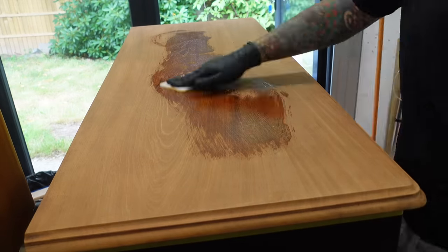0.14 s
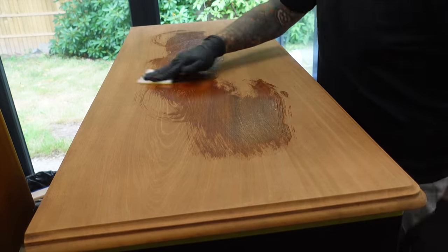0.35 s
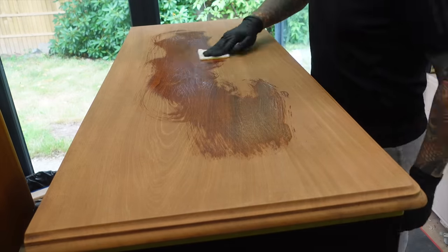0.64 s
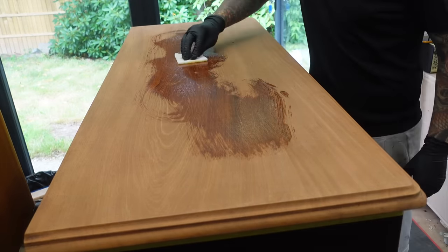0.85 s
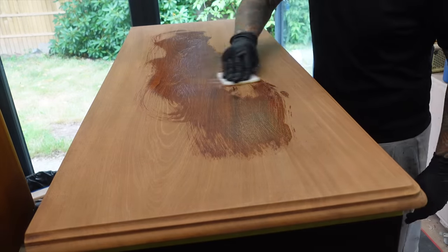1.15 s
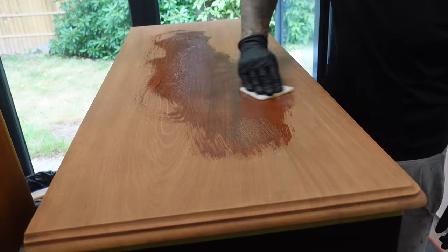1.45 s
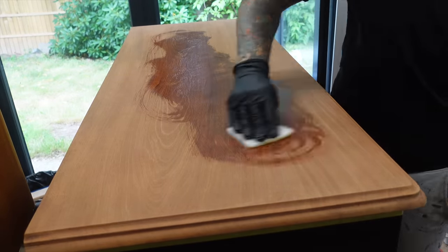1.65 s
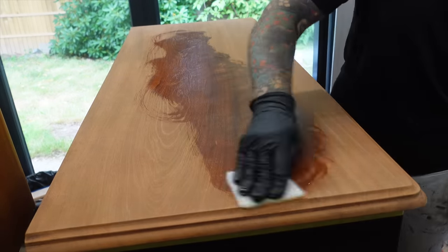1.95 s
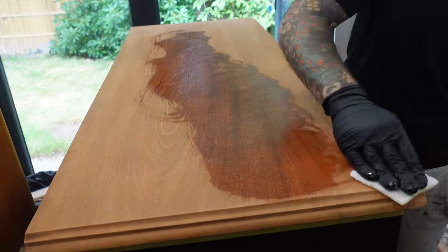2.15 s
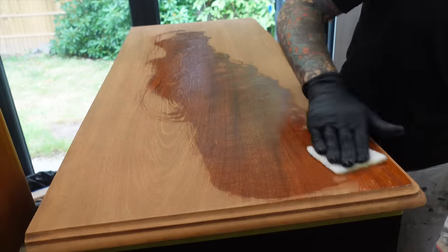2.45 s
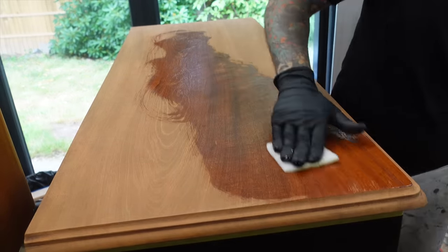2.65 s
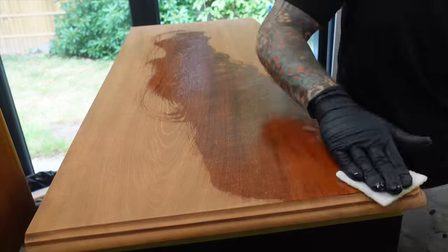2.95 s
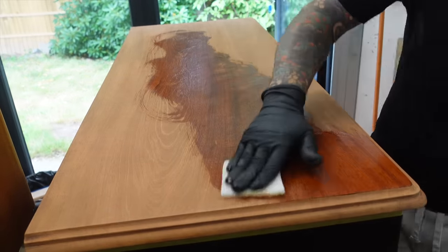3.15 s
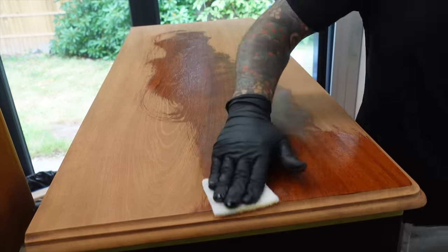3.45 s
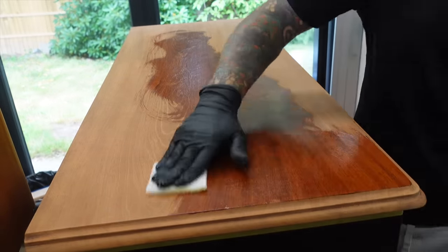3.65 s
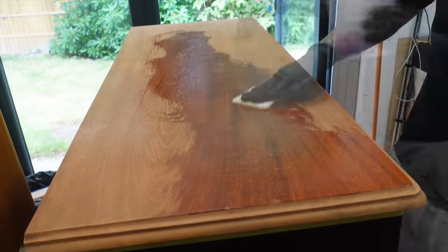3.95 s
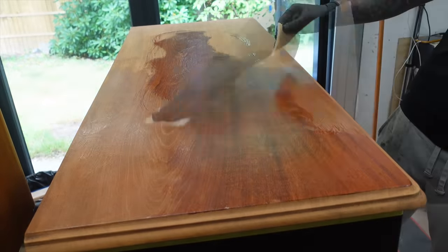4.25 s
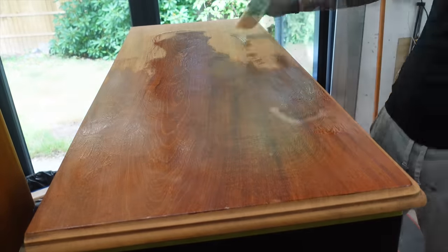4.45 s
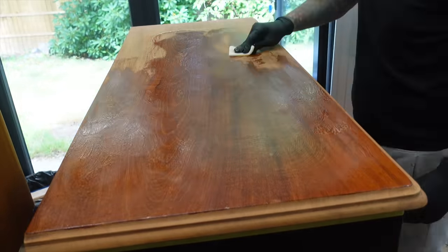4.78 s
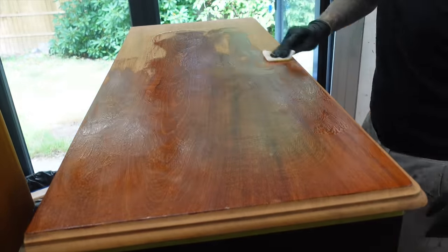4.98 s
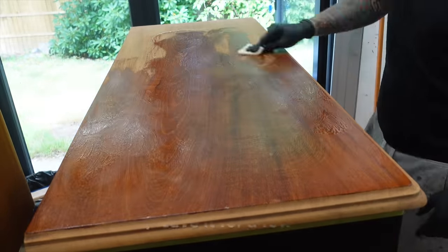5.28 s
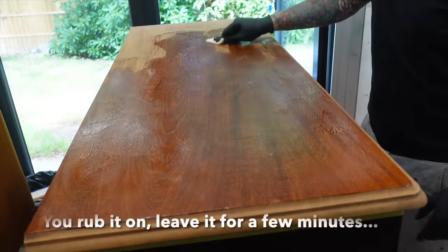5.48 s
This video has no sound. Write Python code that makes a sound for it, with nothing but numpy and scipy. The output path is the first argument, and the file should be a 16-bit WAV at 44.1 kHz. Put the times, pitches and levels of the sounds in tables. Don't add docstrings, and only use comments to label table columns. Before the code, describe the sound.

A cloth pad scrubs a wooden tabletop in very fast, bright hissing strokes, with brief halts, small knocks and faint squeaks.

```python
import sys
import numpy as np
from scipy import signal
from scipy.io import wavfile
from scipy.ndimage import uniform_filter1d

SR = 44100
rng = np.random.default_rng(int(sys.argv[2]) if len(sys.argv) > 2 else 0)


def log_audio(samples):
    frames = np.atleast_2d(samples).T
    limited = np.clip(frames, -1, 1)
    pcm = np.round(limited * 32767).astype(np.int16)
    wavfile.write(sys.argv[1], SR, pcm)


def ratio_of_db(decibels):
    return 10 ** (np.asarray(decibels, float) / 20)


N = 247842
TIME = np.arange(N) / SR


def rms_one(x):
    return x / np.sqrt(np.mean(x ** 2) + 1e-20)


def at_hz(points, hz):
    table_hz, values = np.transpose(points)
    return np.interp(np.log(hz), np.log(table_hz), values)


def along(curve, s):
    when, *columns = np.transpose(curve)
    return [np.interp(s, when, column) for column in columns]


def drift(rate):
    every, settle = 40, 2000
    r = np.exp(-2 * np.pi * rate * every / SR)
    coarse = rng.standard_normal(N // every + 2 + settle)
    slow = signal.lfilter([1], [1, -2 * r, r * r], coarse)[settle:]
    return np.interp(np.arange(N) / every, np.arange(len(slow)), rms_one(slow))


def resonance(x, hz, width):
    r = np.exp(-np.pi * width / SR)
    poles = [1, -2 * r * np.cos(2 * np.pi * hz / SR), r * r]
    return signal.lfilter([(1 - r * r) / 2, 0, (r * r - 1) / 2], poles, x)


def twice_resonant(count, hz, width):
    once = resonance(rng.standard_normal(count), hz, width)
    return rms_one(resonance(once, hz, width))


def banded_noise(spectrum, count, patchy_db, rate, lift_db=0, reach=None):
    steady, out = 0, 0
    edges = np.geomspace(spectrum[0][0], spectrum[-1][0], count + 1)
    white = rng.standard_normal((2, N))
    for k, (low, high) in enumerate(zip(edges, edges[1:])):
        hz = np.sqrt(low * high)
        band_pass = signal.butter(2, [low, high], "band", fs=SR, output="sos")
        band = signal.sosfilt(band_pass, white[k % 2]) * ratio_of_db(at_hz(spectrum, hz))
        steady = steady + np.mean(band ** 2)
        band_lift_db = 0 if reach is None else lift_db * at_hz(reach, hz)
        out = out + band * ratio_of_db(patchy_db * drift(rate) + band_lift_db)
    return out / np.sqrt(steady)


# (frequency [Hz], density [dB per Hz])
HISS = [(1200, -17.5), (2000, -17), (2500, -21), (3100, -15), (3800, -14.5), (4200, -7.5), (4900, -8),
        (5400, -5), (7000, -3.5), (8600, -1), (12100, 1.5), (15200, 0), (17500, 2.5)]
# (frequency [Hz], share [1])
PRESSURE_REACH = [(2000, 0.71), (4000, 1.49), (6500, 0.67), (10000, 0.23)]
# (frequency [Hz], level [dB])
PAD_WHISTLES = [(2580, -33), (3230, -30.5), (3700, -29), (4290, -24), (5300, -19.5), (5900, -26.5),
                (6300, -19), (7030, -18.5), (7580, -43), (9200, -41), (11100, -14), (12500, -44)]


def fibres(hiss_db, pressure_db):
    out = banded_noise(HISS, count=24, patchy_db=2.17, rate=50, lift_db=pressure_db, reach=PRESSURE_REACH)
    for hz, whistle_db in PAD_WHISTLES:
        pressed_db = pressure_db * at_hz(PRESSURE_REACH, hz)
        flare_db = whistle_db - 5 + 4 * drift(25) + pressed_db
        out = out + twice_resonant(N, hz, width=260) * ratio_of_db(flare_db)
    return ratio_of_db(hiss_db + 0.13 * drift(32)) * out


# (time [s], hiss level [dB])
TURNS = [(0.0, -32), (0.063, -42.5), (0.128, -42.5), (0.184, -37.5), (0.236, -36.5), (0.281, -37.5),
         (0.326, -36), (0.37, -33), (0.439, -38), (0.512, -33), (0.607, -42), (0.639, -38.5),
         (0.694, -39.5), (0.839, -29), (0.931, -42), (0.978, -41.0), (1.025, -40.5), (1.066, -40),
         (1.109, -38.5), (1.151, -42), (1.195, -35), (1.236, -41), (1.285, -34), (1.324, -41.5),
         (1.374, -36), (1.419, -37), (1.469, -36), (1.514, -37), (1.565, -36), (1.611, -37.0),
         (1.658, -38.5), (1.704, -37), (1.746, -39), (1.793, -38), (1.837, -38.0), (1.883, -35.5),
         (1.93, -37.5), (1.973, -39), (2.017, -39.5), (2.056, -40.5), (2.13, -50), (2.181, -46),
         (2.232, -50), (2.281, -47.5), (2.324, -54.5), (2.372, -46.5), (2.414, -44.5), (2.46, -42),
         (2.5, -40), (2.546, -48),
         (2.588, -40), (2.634, -44), (2.677, -39), (2.724, -45), (2.768, -41.5), (2.848, -42),
              (2.89, -44), (2.941, -41), (2.993, -47.5), (3.106, -46.5), (3.211, -45.5), (3.254, -43.0),
              (3.302, -46), (3.345, -43), (3.393, -45), (3.438, -42), (3.483, -47.5), (3.578, -47),
              (3.624, -41.5), (3.672, -48), (3.716, -43.5), (3.762, -45.5), (3.822, -40), (3.888, -39.0),
              (3.953, -40.5), (4.048, -46), (4.143, -50), (4.247, -51.5), (4.33, -57.5), (4.504, -44),
              (4.587, -42), (4.613, -46), (4.664, -39), (4.734, -45.5), (4.782, -34), (4.83, -39),
              (4.879, -36), (4.94, -39), (4.97, -43.5), (5.041, -43), (5.086, -46), (5.135, -47),
              (5.183, -49), (5.235, -47), (5.286, -44), (5.333, -45.5), (5.368, -38), (5.428, -38.5),
              (5.497, -40.5), (5.53, -41.0)]
# (time [s], hiss level [dB], pressure as low-hiss gain [dB])
CRESTS = [(0.02, -35.5, -1.5), (0.08, -34, 0), (0.155, -33.5, -4), (0.213, -29, -2.5),
          (0.254, -35, 4), (0.313, -34.5, -1), (0.354, -33.5, -0.5), (0.39, -33.5, 1),
          (0.492, -34.5, 2), (0.536, -34.5, 5), (0.628, -34.5, 3.5), (0.673, -33.0, -1.5),
          (0.724, -32.5, 2), (0.914, -38.5, 2.5), (0.95, -35, 1.5), (1.003, -31, 1),
          (1.05, -34.5, 0.5), (1.097, -29.5, 4), (1.132, -30.5, 2.0), (1.176, -33, 5),
          (1.21, -29.5, 1.5), (1.259, -25.5, -4.5), (1.299, -32, 3), (1.351, -28.5, -3),
          (1.396, -33, 7), (1.444, -28, -4.5), (1.489, -32.5, 0.5), (1.545, -29, -3),
          (1.589, -33, 1.5), (1.635, -29, -0.5), (1.68, -30, -2.0), (1.722, -29, -1), (1.764, -32, 2),
          (1.814, -32, 0.5), (1.859, -28, -2.0), (1.909, -29, -6.5), (1.95, -30, 0.5),
          (1.994, -29.5, -4.5), (2.038, -31.5, 1.0), (2.075, -32.0, 1), (2.162, -38, 0.5),
          (2.199, -41, 5), (2.267, -41, 0.5), (2.306, -41.5, -0.5), (2.344, -39, 4.5),
          (2.401, -39.5, -4), (2.442, -38.5, 1.5), (2.491, -38, -3), (2.527, -38, -0.5),
          (2.579, -39, -2.0),
          (2.609, -37, -1.5), (2.661, -38.5, -1), (2.7, -37.5, -2.5), (2.755, -38, 0.5),
               (2.831, -37.5, -2), (2.866, -37.5, 0.5), (2.916, -37.5, 0), (2.956, -39.5, -3.5),
               (3.062, -36.5, -1), (3.144, -37.5, 4), (3.242, -37.5, 0.5), (3.277, -37, -3.5),
               (3.328, -38, 1.5), (3.375, -38, -1.5), (3.407, -38.5, 0.5), (3.453, -37.5, 2),
               (3.516, -37, 0), (3.592, -39.5, 3.5), (3.644, -36.5, 2), (3.701, -37, 2.5),
               (3.738, -37, 1.0), (3.788, -38.5, 1.5), (3.852, -31.5, -2.5), (3.91, -35.5, 0.5),
               (4.002, -36.5, 3), (4.085, -39.0, 2.5), (4.183, -41, 0.5), (4.284, -43, 1.5), (4.4, -38, -4),
               (4.568, -37, -1.5), (4.597, -40.5, 0), (4.65, -34.0, 0), (4.686, -35.0, 5), (4.766, -33, 3),
               (4.806, -34, 2), (4.86, -34, 1.5), (4.908, -31, -5.5), (4.955, -33.5, 4.5),
               (4.992, -30.5, 0.5), (5.055, -38, -4.0), (5.117, -39.5, -3.0), (5.158, -40.5, -1),
               (5.207, -38.5, -5), (5.26, -39, -1.5), (5.312, -35, -3), (5.355, -35, -4), (5.391, -37, 4.5),
               (5.479, -35.5, 0.5), (5.519, -36.5, 3), (5.569, -34, 0)]
# (time [s], low-hiss gain [dB])
DIGS = [(.265, 4.5), (.345, 6), (1.098, 2), (1.132, -0.5), (1.203, 3), (3.15, 1), (3.52, 4), (4.991, 3),
        (5.3, 2.5), (5.38, 5), (5.469, 5.5)]


def hand(roundness):
    sharp_turn_db, dig_s, grip_chance_db = 0.5, 0.0053, 1.2
    turn, turn_db = np.transpose(TURNS)
    crest, crest_db, press_db = np.transpose(CRESTS)
    knots = np.sort(np.ravel([turn, crest], order="F"))
    phase = np.interp(TIME, knots, np.arange(len(knots)))
    speed = np.abs(np.sin(np.pi / 2 * phase)) ** roundness
    step = np.floor(phase)
    eased = step + np.where(step % 2 == 0, speed, 1 - speed)
    knots_db = np.ravel([turn_db - sharp_turn_db, crest_db], order="F")
    hiss_db = np.interp(eased, np.arange(len(knots)), knots_db)

    pressure_db = np.interp(TIME, crest, press_db)
    for s, dig_db in DIGS:
        pressure_db = pressure_db + dig_db * np.exp(-((TIME - s) / dig_s) ** 2 / 2)

    hum_db = along(PLACE, crest)[0]
    grip_db = hum_db + grip_chance_db * rng.standard_normal(len(crest))
    held_db = uniform_filter1d(grip_db[(step // 2).astype(int)], size=400)
    halt_db = halts()
    return hiss_db + halt_db, speed, pressure_db, held_db + halt_db


# (time [s], drop [dB], slowing [s], picking up [s])
STOPS = [
    (0.849, 27.5, 0.16, 0.057),
    (.845, 20, 0.035, 0.025),
    (4.5, 12, 0.25, 0.065),
    (5.012, 5.5, .008, .03),
    (5.402, 6, 0.0066, 0.016),
    (5.61, 6.5, 0.031, .05),
]


def halts():
    total_db = np.zeros(N)
    for s, drop_db, slowing, picking in STOPS:
        away = np.where(TIME < s, (s - TIME) / slowing, (TIME - s) / picking)
        total_db -= drop_db * np.cos(np.pi / 2 * np.clip(away, 0, 1)) ** 2
    return total_db


# (time [s], hum level [dB], hollowness under the pad [dB], shift along the grain [dB])
PLACE = [(0, -52, -4.5, 2), (.45, -51, -9.5, -3.5), (.66, -49.5, -11, -0.5), (1.0, -55.5, -6, 0.5),
         (1.63, -50, -8.5, 2.5), (1.9, -56.5, -9, 2), (2.13, -70, 5, 4.5), (2.34, -54.5, 6.5, -2.5),
         (2.79, -54.5, 4, 0.5), (3.07, -51.5, -5.5, 1), (3.4, -51, 0, -0.5), (3.75, -62.5, 7, -2.5),
         (3.9, -52, -12, 0.5), (4.4, -59, -4, 0.5), (4.7, -53.5, -3.5, -2.5), (4.99, -70, 4, -3.5),
         (5.08, -66, 6, -2.5), (5.62, -59, 3.5, -3.5)]
# (frequency [Hz], width [Hz], level [dB], share of hollowness [1], share of shift [1])
BOARD_MODES = [(211, 19.4, -18, 2, 0), (317, 90, -11.5, 0.84, -0.3), (385, 52, -8.5, 1.42, -0.3),
               (472, 13, -11.5, 2, 0.7), (589, 17, -9.5, 1.5, 0.7), (777.5, 13, -11.5, 1.53, 0.2),
               (842, 44, -4.5, 1.05, 3.5), (1000, 53, -1, 1, -0.5), (1198, 40, -19, 3.5, 0.5),
               (1354, 21, -9.5, 0.66, 1.4), (1461, 22, -2.5, 0.14, -1.96), (1836, 12, -28.5, -1.2, 6),
               (1983, 58, -4.5, 0, 0), (2310, 300, -13, 0.5, 6)]
# (frequency [Hz], density [dB per Hz])
BOARD_WASH = [(110, -25.5), (200, -20), (400, -15.5), (700, -6.5), (1000, -2.5), (1600, -6.5),
              (2400, -15.5), (4000, -16)]
# (frequency [Hz], share [1])
DEEP_REACH = [(150, 3.8), (300, 2.7), (600, 0.5), (900, 0.019)]


def board(level_db):
    _, hollow_db, shift_db = along(PLACE, TIME)
    wash = banded_noise(BOARD_WASH, count=10, patchy_db=3.5, rate=53, lift_db=hollow_db, reach=DEEP_REACH)
    out = ratio_of_db(level_db - 11) * wash
    for hz, width, mode_db, hollow, shift in BOARD_MODES:
        place_db = hollow * hollow_db + shift * shift_db
        friction_db = level_db + mode_db - 7.5 + place_db + 1.9 * drift(18.2)
        friction = rng.standard_normal(N) * ratio_of_db(friction_db)
        out = out + resonance(friction, hz, width) * np.sqrt(SR / (np.pi * width))
    return out


# (time [s], peak [dB], deep part [dB], crack [dB], scuff after it [dB])
KNOCKS = [(0.074, -36.5, -25, -1, -1), (0.297, -34, -19, -2, -16), (0.625, -44, -23, 22.5, 4),
          (0.630, -40, -20, -9, -15), (1.061, -38.5, -33, 6, 2), (1.989, -25, -28, -2, -5.5),
          (2.193, -39.5, -16, -2, 9), (2.335, -34, -26, -3, 17), (2.442, -32.5, -32, 3, -4),
          (2.53, -35.5, -37, -10, -6), (2.862, -41, -16, 0, -6), (3.118, -34.5, -23, -12, 6),
          (4.183, -38.5, -27, -8, -10), (4.528, -41, -8, 2, -12)]


def knocks():
    out = np.zeros(N)
    t = np.arange(round(0.12 * SR)) / SR
    no_deep = signal.butter(4, 310, "high", fs=SR, output="sos")
    for s, peak_db, deep_db, crack_db, scuff_db in KNOCKS:
        decay = np.exp(-t / 0.003) + ratio_of_db(scuff_db) * np.exp(-t / 0.02)
        contact = rng.standard_normal(len(t)) * decay
        pressed = contact * (1 - np.exp(-t / 0.0012))
        body = 0
        for hz, width, *_ in BOARD_MODES:
            if hz < 700:
                mode_db = min(deep_db + 12.5, -3)
            else:
                mode_db = -11 * np.log2(hz / 1300) ** 2
            ring = resonance(pressed, hz, 3 * width) / np.sqrt(width)
            body = body + ring * ratio_of_db(mode_db + rng.normal(0, 0.17))
        body = signal.sosfilt(no_deep, body)
        crack_decay = np.exp(-t / 0.0034) + 0.47 * np.exp(-t / 0.019)
        crack = resonance(contact, 5800, 11000) * crack_decay
        hit = body / np.abs(body).max() + ratio_of_db(crack_db + 4) * crack / np.abs(crack).max()
        i = round(s * SR)
        out[i:i + len(t)] += ratio_of_db(peak_db) * hit
    return out


# (time [s], peak [dB], frequency [Hz])
JUDDERS = [(2.236, -43.5, 827), (2.293, -46, 947), (2.381, -40, 974), (2.425, -39.5, 1010),
           (2.467, -37, 1046), (2.513, -36.5, 1080), (2.555, -37.5, 1030), (2.602, -39, 1012),
           (2.645, -32.5, 1023), (2.69, -36, 1018), (2.735, -38, 1000), (2.775, -38, 974),
           (2.906, -43, 802), (2.955, -45, 813), (3.272, -55, 825), (3.314, -47, 842), (3.358, -40.5, 866),
           (3.406, -39.5, 886), (3.497, -48, 842), (3.59, -47, 820), (3.635, -39, 870), (3.685, -41, 840),
           (4.535, -49.5, 1020), (5.137, -54, 940), (5.197, -49, 842), (5.249, -44.5, 842), (5.3, -47, 827),
           (5.344, -46, 890), (5.43, -48.5, 847), (5.593, -45.5, 980)]
# (time [s], peak [dB], frequency [Hz])
THUDS = [(0.311, -45, 496), (0.665, -54, 343), (2.775, -46.5, 385), (4.422, -54.5, 337), (4.51, -50.5, 362),
         (4.54, -51, 384), (5.041, -54, 406), (5.138, -52, 350), (5.235, -46, 360), (5.337, -57, 385),
         (5.536, -52, 420)]


def judders(pushes, rise_s, fall_s, split_hz):
    out = np.zeros(N + SR)
    t = np.arange(round(0.1 * SR)) / SR
    swell = (1 - np.exp(-t / rise_s)) * np.exp(-t / fall_s)
    for s, peak_db, hz in pushes:
        phase, other, split = rng.random(3)
        near_hz = hz - split_hz * (1 + split)
        pair = np.sin(2 * np.pi * (hz * t + phase)) + 0.46 * np.sin(2 * np.pi * (near_hz * t + other))
        scuff = rms_one(resonance(rng.standard_normal(len(t)), 0.85 * hz, 0.2 * hz))
        upper = rms_one(resonance(rng.standard_normal(len(t)), 1.47 * hz, 0.12 * hz))
        boom = 0.62 * pair + 0.3 * scuff + 0.16 * upper
        i = round((s - rise_s) * SR)
        out[i:i + len(t)] += ratio_of_db(peak_db - 2.5) * boom * swell / swell.max()
    return out[:N]


# (time [s], level [dB], frequency [Hz], length [s])
SQUEAKS = [(0.193, -41, 7840, 0.018), (0.925, -37.5, 6070, 0.042), (0.992, -41, 6750, 0.021),
           (4.643, -39.5, 6340, 0.022), (4.67, -40.5, 5570, 0.025), (4.678, -46, 6300, 0.011),
           (4.797, -39.5, 7560, 0.032), (4.834, -40, 6000, 0.05), (5.463, -41.5, 4270, 0.017),
           (5.466, -37.5, 8000, 0.022), (5.5, -42.5, 5880, 0.055)]


def squeaks():
    out = np.zeros(N)
    for s, level_db, hz, length in SQUEAKS:
        tone = twice_resonant(4000, hz, width=750)
        count = round(length * SR)
        swell = np.sqrt(np.abs(np.hanning(count)))
        i = round(s * SR)
        out[i:i + count] += ratio_of_db(level_db) * tone[500:500 + count] * swell
    return out


def side_wall(pad):
    delay_s, level_db = 0.0031, -30.5
    warm = pad + ratio_of_db(3) * resonance(pad, 420, 810)
    return ratio_of_db(level_db) * np.roll(warm, round(delay_s * SR))


# (frequency [Hz], density [dB per Hz])
ROOM = [(60, -43), (130, -58), (260, -25), (600, -4.5), (1050, -1), (2000, -2.5), (4000, -8), (8000, 7),
        (16000, -17.5)]
# (frequency [Hz], density [dB per Hz])
ROOM_SIDE = [(100, -25), (250, -42), (500, 12), (1100, 9.5), (2000, 1), (4000, -3.5), (9000, -37),
             (16000, -6)]


def workshop():
    mid = ratio_of_db(-57) * banded_noise(ROOM, count=7, patchy_db=2.5, rate=11)
    side = ratio_of_db(-69) * banded_noise(ROOM_SIDE, count=9, patchy_db=-5.5, rate=1.8)
    return mid + side * np.array([[1], [-1]])


def scene():
    hiss_db, speed, pressure_db, board_db = hand(roundness=0.54)
    hollow_db = along(PLACE, TIME)[1]
    pause_db = -np.maximum(8 + 0.41 * hollow_db, 0) * (1 - speed ** 4)
    pad = fibres(hiss_db, pressure_db) + board(board_db + pause_db + 3)
    pad = pad + knocks() + squeaks()
    pad = pad + judders(JUDDERS, rise_s=0.0068, fall_s=0.015, split_hz=49.3)
    pad = pad + judders(THUDS, rise_s=0.00382, fall_s=0.013, split_hz=47.6)
    return pad + side_wall(pad) * np.array([[1], [-1]]) + workshop()


def roll_off(x):
    return signal.sosfilt(signal.butter(12, 17090, fs=SR, output="sos"), x)


def record(dry):
    low_cut_hz, top_cut_hz = 188, 15740
    x = signal.sosfilt(signal.butter(4, low_cut_hz, "high", fs=SR, output="sos"), dry)
    noise = rng.standard_normal(N) + 0.24 * rng.standard_normal((2, N)) * [[1], [-1]]
    rumble = rms_one(signal.sosfilt(signal.butter(2, 90, fs=SR, output="sos"), noise))
    shaking = uniform_filter1d(np.abs(resonance(x[0], 500, 730)), size=900)
    x = x + ratio_of_db(-43.5 + 5.5 * drift(3.3)) * shaking * rumble
    mix = signal.sosfilt(signal.ellip(12, 0.5, 75, top_cut_hz, fs=SR, output="sos"), x)
    return roll_off(mix)


dry = scene()
out = record(dry)
log_audio(out)
```